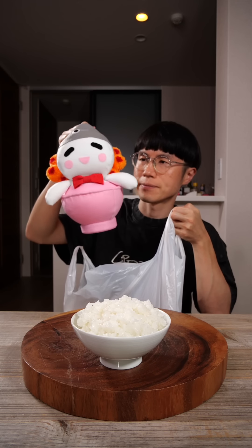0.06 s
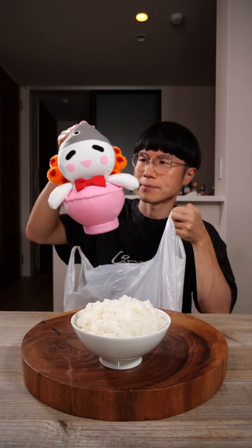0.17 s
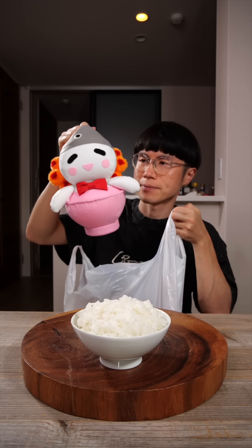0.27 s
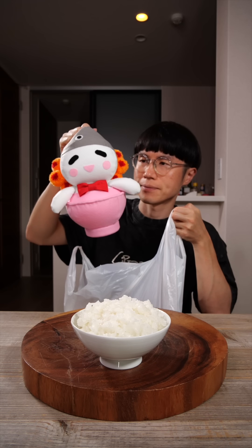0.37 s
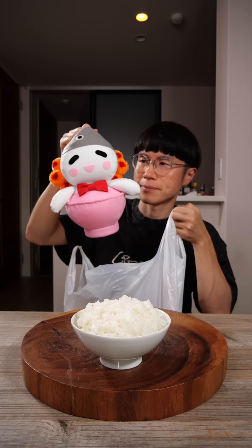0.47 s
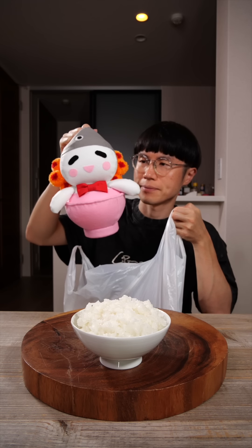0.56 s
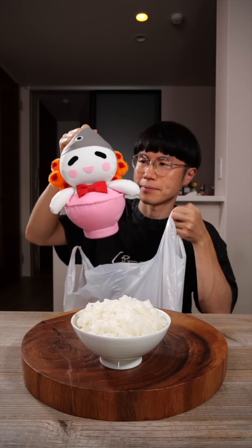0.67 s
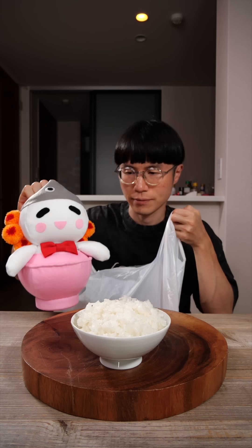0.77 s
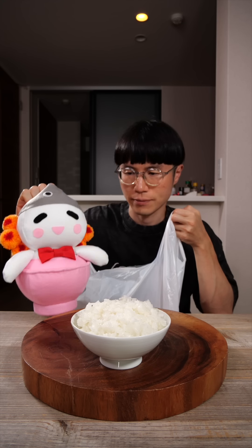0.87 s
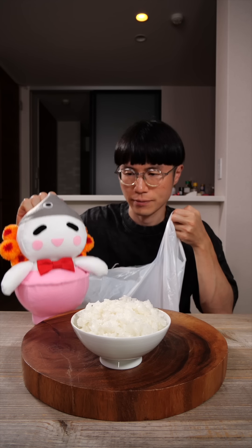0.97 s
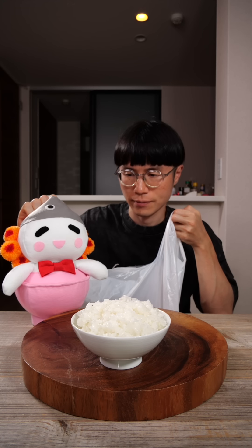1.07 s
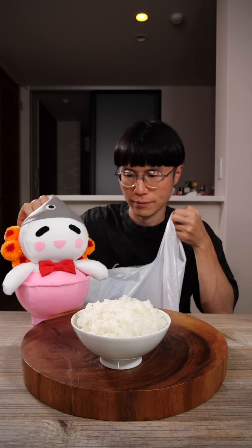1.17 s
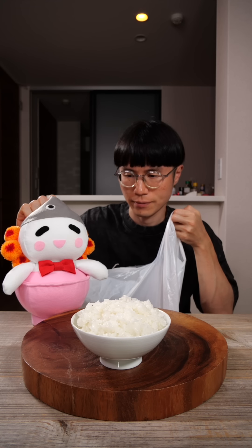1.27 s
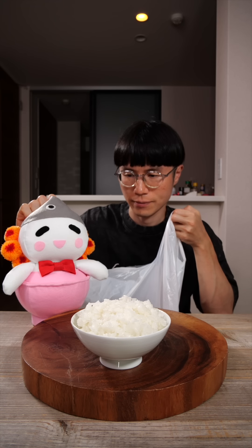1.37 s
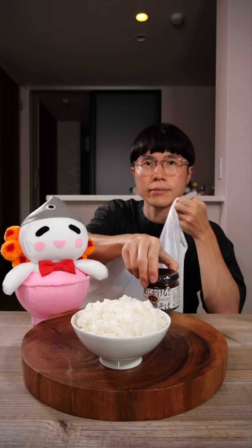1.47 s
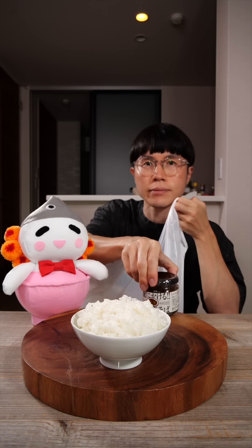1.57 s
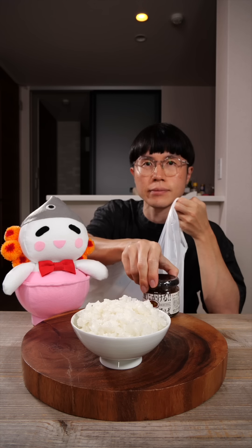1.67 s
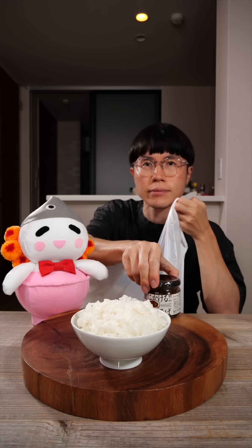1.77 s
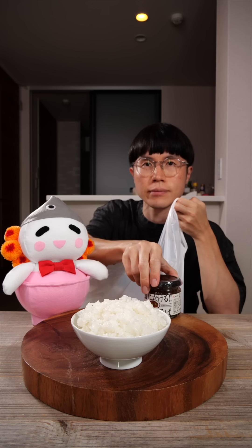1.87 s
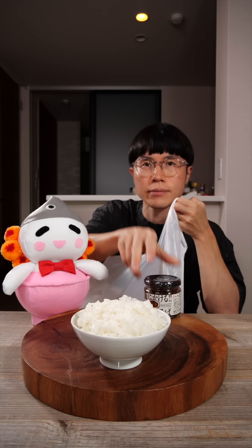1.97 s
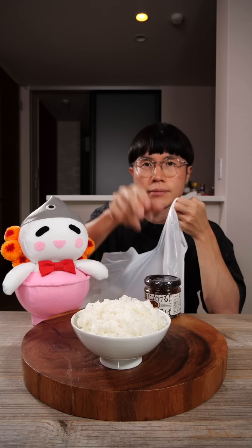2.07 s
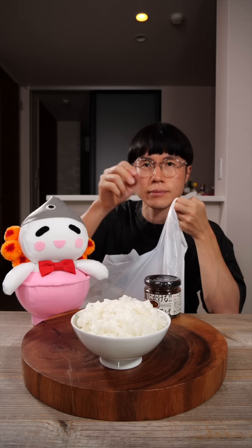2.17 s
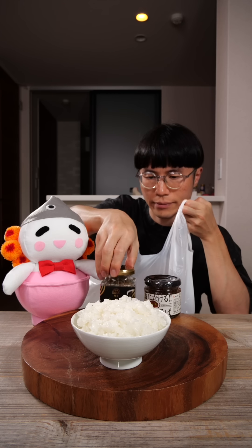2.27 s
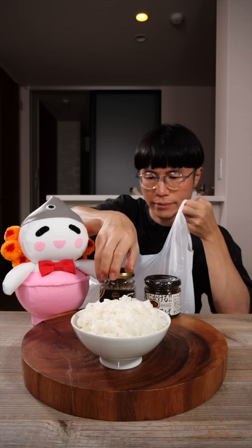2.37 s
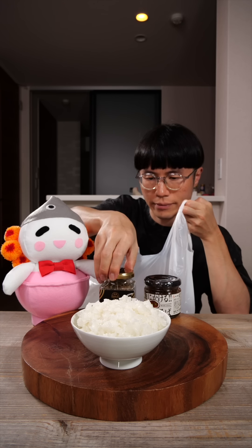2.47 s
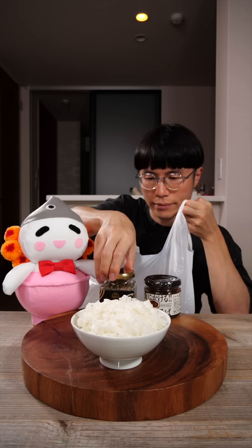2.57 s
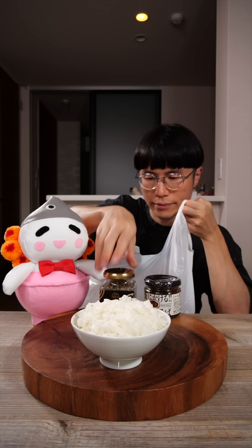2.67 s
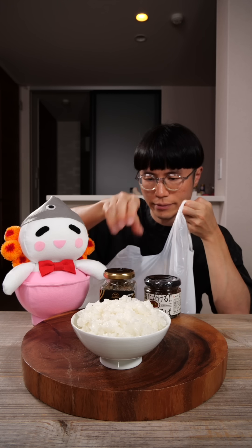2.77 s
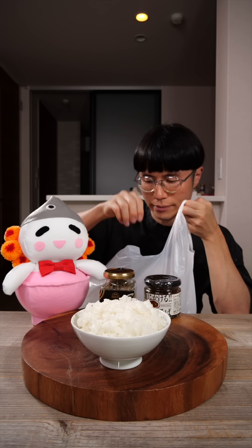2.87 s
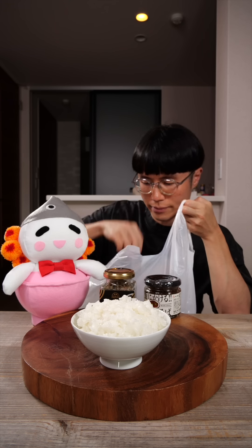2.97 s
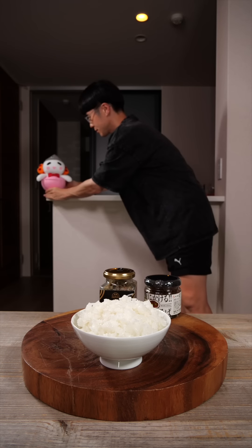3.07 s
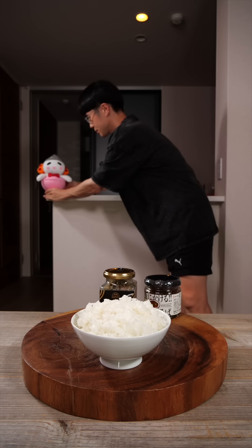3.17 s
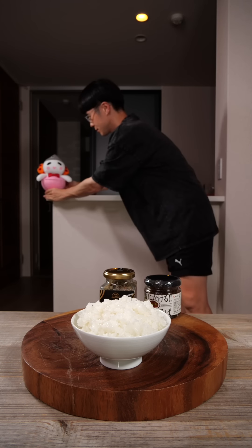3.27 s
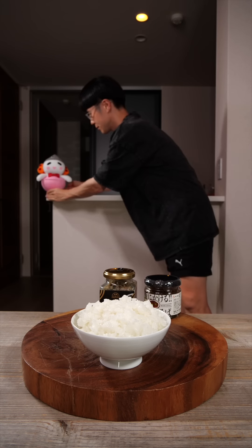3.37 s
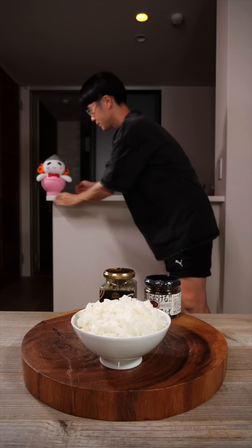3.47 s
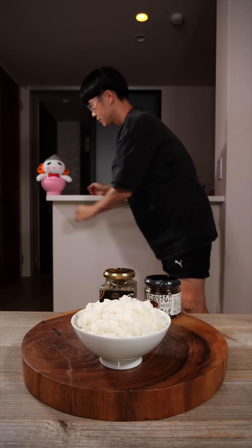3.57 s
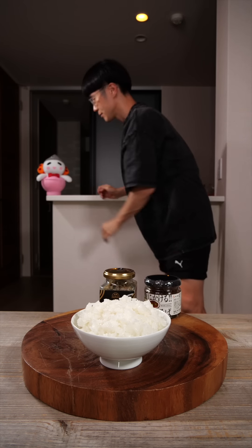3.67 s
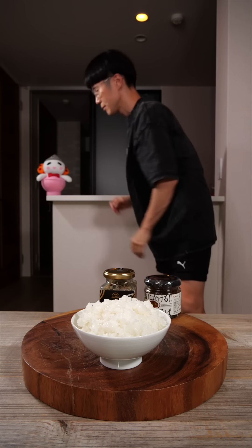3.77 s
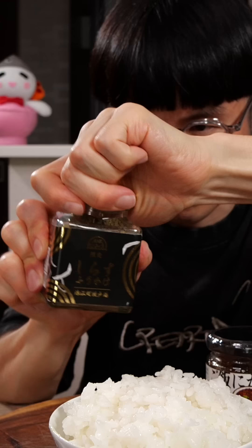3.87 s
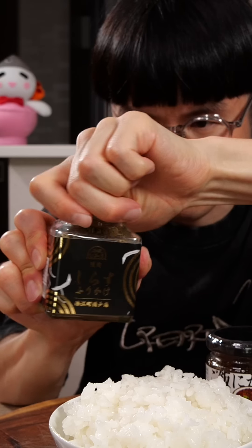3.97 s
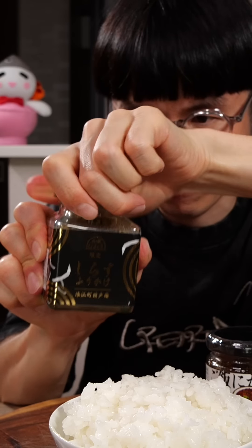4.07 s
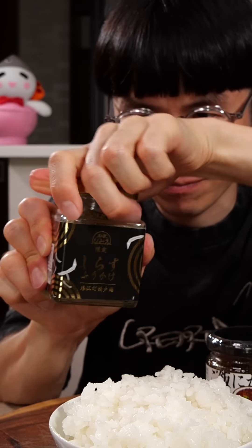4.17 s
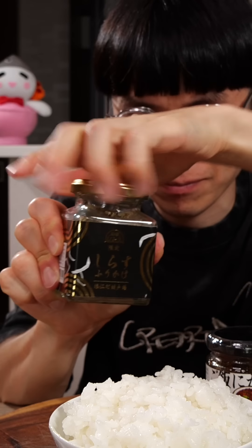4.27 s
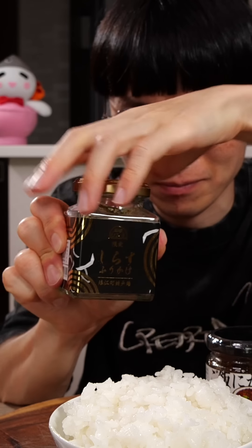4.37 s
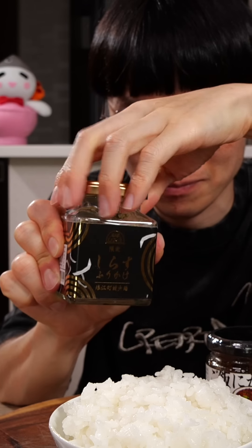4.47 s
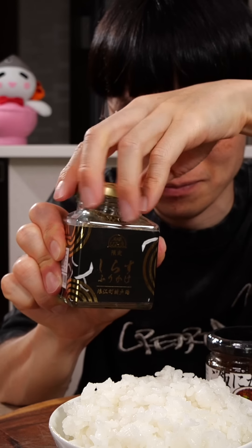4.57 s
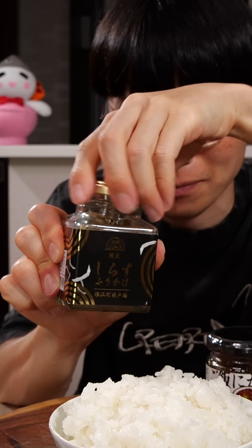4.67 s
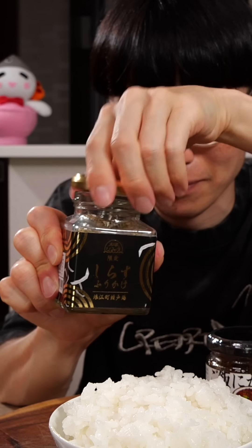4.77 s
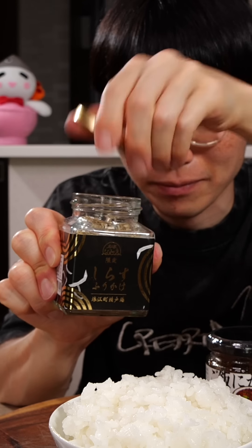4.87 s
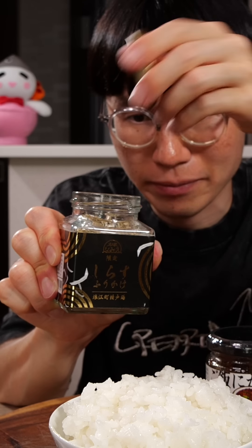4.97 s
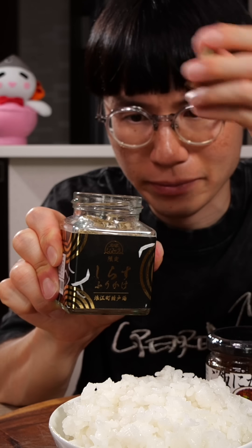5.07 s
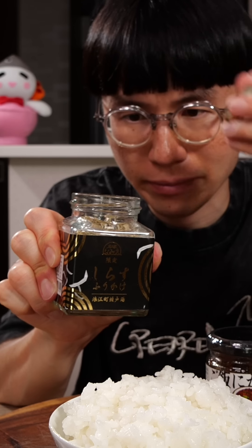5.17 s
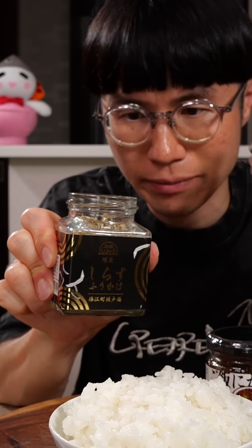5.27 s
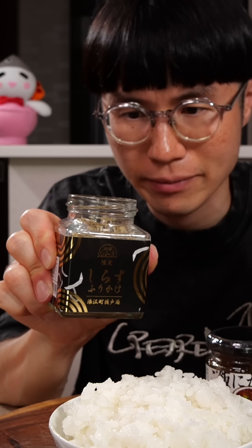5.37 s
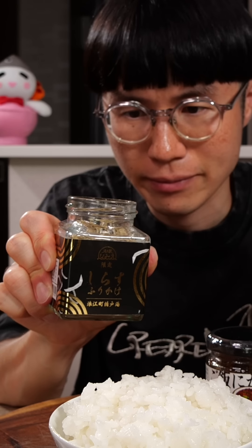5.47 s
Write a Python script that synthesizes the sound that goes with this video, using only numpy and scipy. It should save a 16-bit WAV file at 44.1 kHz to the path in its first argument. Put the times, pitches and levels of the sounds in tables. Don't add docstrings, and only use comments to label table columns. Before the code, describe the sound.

Close stereo pickup at a wooden table over faint steady room noise. Plastic film rustles and snaps, mostly slightly left; a stuffed toy lands with a muted low thump. The bag jerks, a jar knocks hard and settles, then a second, duller jar lands and is nudged. Abrupt cuts chop the short echo. A soft thud on a counter and airy clothing swish precede a jar lid's gritty, ringing twist.

```python
import sys
import numpy as np
from scipy import signal
from scipy.io import wavfile

SR = 44100
rng = np.random.default_rng(int(sys.argv[2]) if len(sys.argv) > 2 else 0)


def bounce(signal):
    frames = np.transpose(np.atleast_2d(signal))
    limited = np.clip(frames, -1, 1)
    pcm = np.round(limited * 32767).astype(np.int16)
    wavfile.write(sys.argv[1], SR, pcm)


def attenuation_scalar(level_db):
    decades = np.asarray(level_db, float) / 20
    return 10 ** decades


N = 243431

CUTS = [
    0,
    2.272,
    3.072,
    3.903,
]
# time in seconds, peak in dB, softness cut in Hz.
TOY_ON_TABLE = [
    (1.0575, -25.5, 560),
    (1.078, -36, 310),
]
BAG_LAG, TABLE_LAG = 5, 2
JAR_T60_CAP_S, TOY_T60_CAP_S = .04, .15


def rms_one(x):
    return x / np.sqrt(np.mean(x ** 2) + 1e-20)


def at_hz(points, hz):
    table_hz, value = np.array(points)[:, 0], np.array(points)[:, 1]
    return np.interp(np.log(hz), np.log(table_hz), value)


def filtered(x, order, hz, kind="low"):
    return signal.sosfilt(signal.butter(order, hz, kind, fs=SR, output="sos"), x)


def drift(rate):
    r = np.exp(-80 * np.pi * rate / SR)
    chance = rng.standard_normal(N // 40 + 2002)
    slow = signal.lfilter([1], [1, -2 * r, r * r], chance)[2000:]
    return np.interp(np.arange(N) / 40, np.arange(len(slow)), rms_one(slow))


def swells(rows, fall_db_per_s):
    start, rise, hold, top_db, *rest = np.transpose(rows)[:, :, None]
    since = np.arange(N) / SR - start
    below_db = 20.5 * np.clip(1 - since / rise, 0, 1)
    below_db = below_db + fall_db_per_s * np.clip(since - rise - hold, 0, 9)
    return np.where(since < 0, -200, top_db - np.minimum(below_db, 150)), *rest


def ring(x, hz, t60):
    r = np.exp(-np.log(1000) / (t60 * SR))
    w = 2 * np.pi * min(hz, SR / 2.2) / SR
    return signal.lfilter([.5, 0, -.5], [1, -2 * r * np.cos(w), r * r], x + 1e-18)


def grains(size, per_s, spread_db):
    sizes = attenuation_scalar(spread_db * np.minimum(rng.exponential(1, size), 4)) * rng.choice([-1, 1], size)
    return rms_one(sizes * (rng.random(size) < per_s / SR))


def bands(mid_side, gain_at):
    # pitch in Hz, left-right likeness from 0 to 1.
    likeness = [(30, .92), (300, .92), (700, .75), (1000, .55), (1600, .35), (3000, .25), (6000, .12),
                (12000, .05)]
    out, edges = 0, 17 * 2 ** np.arange(0, 10.1, .5)
    for k, (low, high) in enumerate(zip(edges, edges[1:])):
        mid, side = filtered(mid_side[k % 2], 2, [low, high], "band")
        hz = np.sqrt(low * high)
        alike = np.clip(at_hz(likeness, hz), 0, 1)
        both = np.sqrt(1 + alike) * mid + np.sqrt(1 - alike) * side * [[1], [-1]]
        out = out + gain_at(hz) * both
    return out


def place(x, pan_db, lag):
    left, right = x * attenuation_scalar([[pan_db / 2], [-pan_db / 2]])
    return np.array([left, np.roll(right, lag)])


def blows(hits, modes, cap):
    push = np.zeros(N)
    for s, level_db, cut_hz in hits:
        r = np.exp(-2 * np.pi * cut_hz / SR)
        pulse = signal.lfilter([(1 - r) ** 2], [1, -2 * r, r * r], np.eye(1, 600)[0])
        start = round(s * SR)
        push[start:start + len(pulse)] += attenuation_scalar(level_db) * pulse
    out = 0
    for k, (hz, db, t60) in enumerate(modes):
        out = out + (-1) ** k * attenuation_scalar(db) * ring(push, hz, min(t60, cap))
    return out


def toy_on_table():
    # pitch in Hz, level in dB, ringing time in seconds.
    wood = [(205, -4, 0.078), (260, -4, 0.12), (342.7, 8.5, 0.091), (431.7, -2.5, 0.052), (517, -2, 0.12),
            (643, 3.5, 0.057), (866, -9.5, 0.059)]
    return blows(TOY_ON_TABLE, wood, TOY_T60_CAP_S)


def first_jar():
    # time in seconds, peak in dB, softness cut in Hz.
    knocks = [
        (1.6757, -8, 3880),
        (1.6800, -15, 2600),
        (1.695, -27.5, 903),
        (1.7825, -31, 900),
        (1.7845, -12, 1100),
        (1.788, -39, 1220),
    ]
    # pitch in Hz, level in dB, ringing time in seconds.
    glass_and_wood = [(203, -20.5, .08), (324, -13.5, 0.066), (406, -9.5, .05), (475, -13, 0.062),
                      (610, -7, .05), (771, -18, 0.014), (800, -14.5, 0.079), (1072, 3.5, 0.02),
                      (1343, 0, 0.023), (1670, -1.5, 0.015), (2000, 3, 0.014), (2305, 0, .014),
                      (2600, -2, 0.011), (2960, -0.5, 0.0029), (4320, -5.5, 0.0018), (7500, -20.5, .003)]
    return blows(knocks, glass_and_wood, JAR_T60_CAP_S)


def second_jar():
    # time in seconds, peak in dB, softness cut in Hz.
    knocks = [
        (2.380, -54.5, 3000),
        (2.391, -62, 3480),
        (2.4018, -8.5, 2000),
        (2.4060, -13.5, 1900),
        (2.4198, -23.5, 1490),
        (2.468, -23, 1300),
        (2.530, -22.5, 1100),
    ]
    # pitch in Hz, level in dB, ringing time in seconds.
    glass_and_wood = [(200, -14.5, .08), (320, -6.5, 0.018), (430, -10, 0.051), (493, -16.5, 0.046),
                      (630, -1, 0.023), (793, -3.5, 0.038), (852, -2, 0.043), (1084, 2.5, 0.065),
                      (1250, 10, 0.0058), (1573, -18, 0.005), (1770, -8, .015), (2060, 3, 0.006),
                      (2500, -4.5, 0.018), (3650, -15.5, 0.0087), (4470, -20.5, .006), (7460, -26, 0.0036)]
    return blows(knocks, glass_and_wood, JAR_T60_CAP_S)


def toy_on_counter():
    # time in seconds, peak in dB, softness cut in Hz.
    thuds = [
        (3.089, -39, 356),
        (3.096, -19.5, 250),
        (3.112, -26.5, 260),
        (3.128, -26, 260),
    ]
    # pitch in Hz, level in dB, ringing time in seconds.
    wood = [(166, -13, .1), (210.3, 2, 0.12), (253, -1, 0.044), (311, 3.5, 0.043), (433, -5.5, 0.059),
            (511, -6, 0.048), (660, -22, 0.12), (724, -18.5, 0.087)]
    return blows(thuds, wood, TOY_T60_CAP_S)


def table_sway():
    # pitch in Hz, level in dB, ringing time in seconds.
    legs = [(32.67, -22.5, .4)]
    return blows(TOY_ON_TABLE, legs, 1)


def lid():
    # pitch in Hz, width in Hz (wider fades sooner), level in dB.
    tin_notes = [(241, 150, -16), (419, 91, -5), (670, 92, -11), (990, 200, -2.5), (1200, 69, -1.5),
                 (1630, 500, -26), (2122, 68, -4.5), (3080, 180, -6), (3380, 57, -9), (4320, 65, -5.5),
                 (4580, 160, -16), (4860, 380, -6), (5740, 140, -5), (7470, 510, -4), (8980, 58, -17),
                 (10460, 400, -13.5), (11440, 350, -17.5), (13300, 700, -9.5), (14780, 1500, -27),
                 (11000, 5600, -28)]
    # time in seconds, level in dB, tilt in dB per octave.
    ticks = [(4.034, -29, -6.5), (4.040, -29.5, -0.5), (4.054, -19.5, -4), (4.096, -33.5, 2.5),
             (4.164, -31, -11), (4.197, -26, -10), (4.392, -33.5, 6.5), (4.555, -19.5, -12),
             (4.676, -13, -11.5), (4.701, -16.5, -11), (4.770, -20.5, -5.5), (4.788, -22, -13),
             (4.814, -42, 5), (4.853, -30, -0.5)]
    # time in seconds, level in dB, length in seconds,
    # tilt in dB per octave, grip from 0 to 1.
    scrapes = [(3.884, -49, 0.094, -1.5, 0.54), (4.073, -26.5, 0.0079, -7, 0.12),
               (4.218, -23, 0.007, -1, 0.16), (4.225, -21.5, 0.0053, 2.5, 0),
               (4.233, -21.5, 0.015, 1.5, 0.1), (4.314, -30, 0.02, 1.5, 0.06),
               (4.348, -33.5, 0.012, -1.5, 0.3), (4.363, -31.5, 0.028, 2.5, 0.13),
               (4.501, -25, 0.0049, 4, 0.55), (4.513, -19, 0.0068, 2.5, 0.62),
               (4.525, -26, 0.0067, -13, .3), (4.625, -23.5, 0.0059, 0.5, 0.57)]
    # start in seconds, rise in seconds, hold in seconds, level in dB.
    turns = [
        (4.03, 0.22, .01, -40),
        (4.235, .015, 0.086, -34.5),
        (4.43, 0.075, 0.011, -52),
        (4.58, 0.14, 0.041, -34.5),
    ]
    tick_s, tick_grip = 0.0017, 0.39
    loose_s = 4.6

    start = round(CUTS[-1] * SR)
    t = np.arange(start, N) / SR
    contacts = [(s, db, tick_s, tilt, tick_grip) for s, db, tilt in ticks] + scrapes
    s, level_db, length, tilt_db, grip = np.transpose(contacts)
    grip = np.clip(grip, 0, 1)
    since = t - s[:, None]
    shapes = (since >= 0) * np.exp(-(np.clip(since, 0, 1) / length[:, None]) ** 3)
    knock = (since >= 0) & (since < 1 / SR)
    rub = attenuation_scalar(swells(turns, fall_db_per_s=167)[0]).sum(axis=0) * attenuation_scalar(0.34 * drift(30))
    rub = rub[start:]
    shared = grains(len(t), 10000, 2.3)
    uneven = rng.standard_normal((len(s), len(tin_notes)))
    aim = rng.standard_normal((len(tin_notes), 2))
    out = np.zeros((2, N))
    for k, (hz, width_hz, db) in enumerate(tin_notes):
        friction = 0.33 * shared + 0.91 * rng.standard_normal(len(t))
        force = shapes * friction + 4 * knock
        body_db = -9.0 * (s > loose_s) * (hz < 700)
        bright_db = tilt_db * max(np.log2(hz / 1200), 0)
        strength = attenuation_scalar(level_db + body_db + bright_db + 3 * uneven[:, k])
        free = (strength * (1 - grip)) @ force
        free = free + friction * rub * attenuation_scalar(-9.5 - 2 * np.log2(hz / 1200))
        held = (strength * grip) @ force
        free_t60 = np.log(1000) / np.pi / width_hz
        held_t60 = 2.2 / (width_hz + 400)
        sound = ring(free, hz, free_t60) + 1.13 * ring(held, hz, held_t60)
        lag = (hz < 9000) * (TABLE_LAG + round(aim[k, 1]))
        out[:, start:] += place((-1) ** k * attenuation_scalar(db - 21) * sound, -1.6 + aim[k, 0], lag)
    return filtered(out, 2, 150, "high")


def snaps():
    # time in seconds, peak in dB, centre pitch in Hz.
    toy_creases = [(0.0124, -39, 4850), (0.0558, -46, 5120), (0.1037, -45, 6450), (0.1371, -40, 6340),
                   (0.1555, -41, 4700), (0.174, -37, 4160), (0.2219, -37, 7050), (0.2478, -32, 5170),
                   (0.2604, -43, 5230), (0.4903, -38, 8250), (0.5427, -36, 2580), (0.6404, -44, 7230),
                   (0.6609, -41, 6820), (0.7632, -56, 6800), (0.8964, -42, 7570), (0.9492, -34, 5520),
                   (0.9734, -42, 5590), (0.9864, -44, 5200), (1.054, -42, 2500), (1.1248, -44, 8740),
                   (1.1538, -48, 6630)]
    # time in seconds, peak in dB, centre pitch in Hz.
    jar_creases = [(1.4147, -50, 2870), (1.4232, -51, 5870), (1.4731, -35, 5390), (1.5084, -40, 3710),
                   (1.5494, -35, 2960), (1.6392, -44, 5910), (1.736, -35, 2740), (1.7794, -42, 2550),
                   (1.952, -36, 11900), (1.9564, -36, 10200), (1.9794, -38, 3580), (2.0113, -36, 4840),
                   (2.0562, -40, 5540), (2.0877, -39, 5670), (2.2084, -40, 3750), (2.6818, -49, 8210),
                   (2.7636, -60, 2730), (2.8848, -51, 7840), (2.9113, -47, 3520), (2.9866, -40, 7730),
                   (3.0096, -41, 3360), (3.021, -36, 3350), (3.0344, -40, 2860), (3.0555, -41, 10100)]
    out, fade = np.zeros((3, N)), np.arange(1500) / SR
    for s, level_db, hz in toy_creases + jar_creases:
        noise = rng.standard_normal((3, len(fade)))
        shared, left, right = noise * np.exp(-1000 * fade / 1.2)
        crackle = np.array([shared + .7 * left, shared + .7 * right, 4 * (fade == 0)])
        broad = filtered(crackle, 2, [900, 17000], "band")
        pop = broad + .5 * ring(crackle, hz, 5 / hz)
        start = round(s * SR)
        out[:, start:start + len(fade)] += attenuation_scalar(level_db + 5.5) * pop / np.abs(pop[:2]).max()
    return out


def rustle():
    # pitch in Hz, level in dB per Hz.
    film = [(180, -32.5), (300, -10.5), (656, -8), (1230, -13), (1580, -7.5), (2210, -16.5), (2880, -9.5),
            (6620, -10.5), (16000, -31)]
    # start in seconds, rise in seconds, hold in seconds,
    # hiss level in dB, tilt in dB per octave.
    moves = [
        (-.05, 0.022, 0.34, -61.5, -0.5),
        (0.94, 0.046, .1, -59.5, -2.5),
        (1.463, 0.0068, 0.12, -50.5, -2),
        (1.691, 0.04, 0.13, -59.5, -6.5),
        (1.919, .03, 0.15, -53, -0.5),
        (2.739, 0.29, 0.0194, -57, -1.5),
        (3.36, 0.11, 0.27, -62, 0),
        (3.76, .02, 0.45, -70, -1.5),
    ]
    level_db, tilt_db = swells(moves, fall_db_per_s=143.5)
    level = attenuation_scalar(level_db)
    for cut in CUTS[1:-1]:
        level[np.array(moves)[:, 0] < cut, round(cut * SR):] = 0
    crackle = np.array([[grains(N, 5300, 3.4) for side in range(2)] for neighbour in range(2)])
    clumps = drift(31)

    def gain_at(hz):
        moving = attenuation_scalar(tilt_db[:, 0] * np.log2(hz / 6000)) @ level
        return moving * attenuation_scalar(at_hz(film, hz) + 2.5 * clumps + 2.1 * drift(45))

    return attenuation_scalar(12) * bands(crackle, gain_at)


def swish():
    # start in seconds, rise in seconds, hold in seconds, level in dB.
    brushes = [(3.59, .04, .05, -64.5)]
    air = filtered(rng.standard_normal((2, N)), 2, 8500, "high")
    return attenuation_scalar(swells(brushes, fall_db_per_s=160)[0][0] + 7.5) * rms_one(air)


def room(x):
    # pitch in Hz, echo time (to fall 60 dB) in seconds.
    echo_times = [(100, 0.58), (300, 0.53), (1000, 0.42), (2500, 0.28), (6000, 0.38), (14000, 0.16)]
    t = np.arange(round(.9 * SR)) / SR
    noise = rng.standard_normal((2, 2, len(t)))
    echoes = bands(noise, lambda hz: attenuation_scalar(-60 * t / at_hz(echo_times, hz)))
    echoes *= 1 - np.exp(-(t / 0.0025) ** 2)
    echoes /= np.sqrt(np.sum(echoes ** 2) / 2)
    out, ends = np.zeros((2, N)), [round(s * SR) for s in CUTS] + [N]
    for a, b in zip(ends, ends[1:]):
        out[:, a:b] = signal.fftconvolve(x[None, a:b], echoes, axes=1)[:, :b - a]
    return out


def room_tone():
    # pitch in Hz, level in dB per Hz.
    hum = [(11, -56), (18, -19.5), (196, -12.5), (239, -2.5), (376, -11.5), (422, -10), (744, -15),
           (810, -15.5), (988, -17), (1080, -20.5), (1700, -24.5), (2320, -24.5), (16000, -39.5)]
    noise = rng.standard_normal((2, 2, N))
    return attenuation_scalar(-61.5) * rms_one(bands(noise, lambda hz: attenuation_scalar(at_hz(hum, hz) + 1.2 * drift(6))))


def scene():
    toy, far_toy = toy_on_table(), toy_on_counter()
    first, second = first_jar(), second_jar()
    tin, creases = lid(), snaps()

    near = place(toy, -1.4, TABLE_LAG) + place(far_toy, -2.2, BAG_LAG)
    near = near + place(first, -2.2, TABLE_LAG) + place(second, -2.2, TABLE_LAG)
    bag = place(creases[:2], -5.5, BAG_LAG) + place(rustle(), -2.5, BAG_LAG)
    bag = bag + place(swish(), -1.34, BAG_LAG)

    sent = attenuation_scalar(-7.5) * toy + attenuation_scalar(-4.5) * far_toy
    sent = sent + attenuation_scalar(-8.5) * first + attenuation_scalar(-5.0) * second
    sent = sent + attenuation_scalar(-6.5) * filtered(tin[0], 1, 5000)
    sent = sent + attenuation_scalar(1.5) * creases[2]
    echo = place(room(sent), -1.5, TABLE_LAG)

    sources = filtered(near + tin + bag + echo, 4, 160, "high")
    sway = place(table_sway(), -8.0, BAG_LAG)
    return sources + sway + place(room_tone(), -0.92, BAG_LAG)


def top_cut(x):
    return signal.sosfilt(signal.butter(12, 16650, fs=SR, output="sos"), x)


def record(dry):
    # pitch in Hz, relative width, level in dB.
    bass_strips = [(108, 0.39, -12.5), (303, 0.097, -5), (564, 0.078, 1.5), (710, .06, -7)]
    peak, bass_in_s = 1.05, .318
    heard = filtered(peak * np.tanh(dry / peak), 3, 15500)
    heard = signal.sosfilt(signal.cheby2(18, 60, 16900, fs=SR, output="sos"), heard)
    thin = filtered(heard, 6, 950, "high")
    for hz, width, db in bass_strips:
        thin = thin + attenuation_scalar(db) * filtered(heard, 2, [hz / (1 + width), hz * (1 + width)], "band")
    mix = np.where(np.arange(N) < bass_in_s * SR, thin, heard)
    return top_cut(mix)


dry = scene()
out = record(dry)
bounce(out)
```